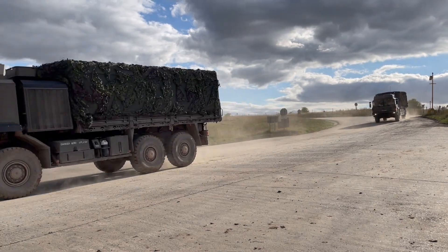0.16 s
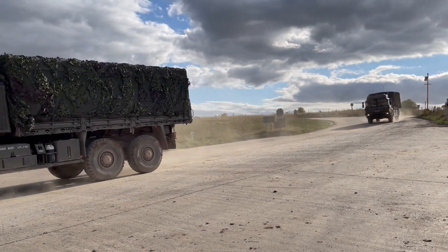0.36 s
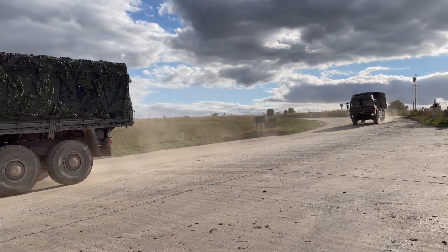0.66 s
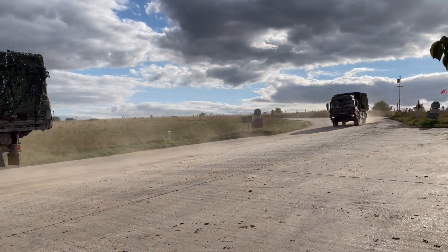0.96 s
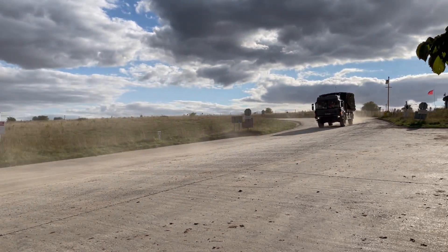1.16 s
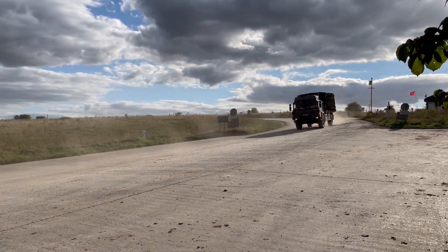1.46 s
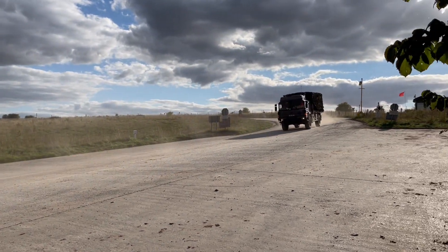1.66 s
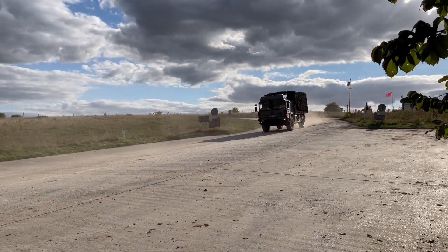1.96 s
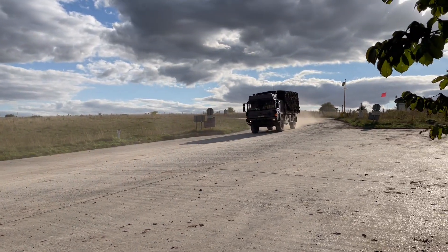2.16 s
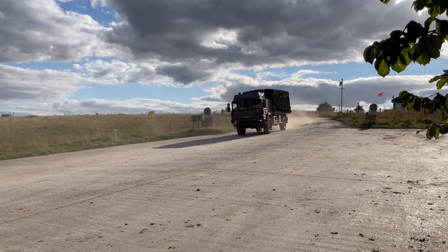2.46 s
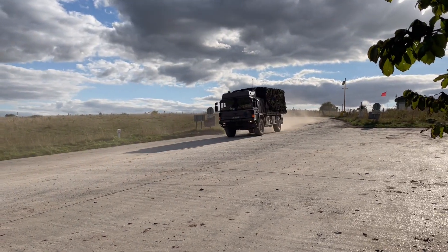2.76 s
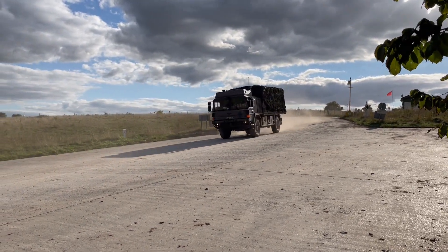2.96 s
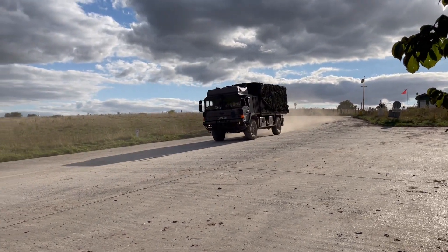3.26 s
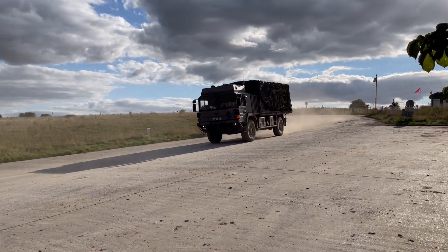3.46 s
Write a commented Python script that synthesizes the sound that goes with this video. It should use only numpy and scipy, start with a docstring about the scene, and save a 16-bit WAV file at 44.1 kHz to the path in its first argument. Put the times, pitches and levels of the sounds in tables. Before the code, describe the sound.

Low truck engine and tyre roar leaving, panels clattering, valves hissing, another heavy truck nearing

```python
"""Tyre and fan roar, exhaust growl and a low drone come first: a heavy truck on a dusty concrete track.
It drives away while a second one nears. Roar is coloured noise, growl pulsed noise through a resonance;
engines, drone and gear whine are sums of wavering orders. Knocks in loose panels clatter, gravel ticks,
air valves hiss in four bursts (shaped noise), two thin squeaks end it (wobbling sines).
Two microphone ports hear it with their own phase and balance."""
import sys
import numpy as np
from scipy import signal
from scipy.fft import rfft, irfft
from scipy.io import wavfile
from scipy.ndimage import uniform_filter1d

SR = 44100
rng = np.random.default_rng(int(sys.argv[2]) if len(sys.argv) > 2 else 0)


def master_out(mix):
    """Clip the mix to full scale and print it as 16-bit PCM to the path in sys.argv[1]."""
    frames = np.transpose(np.atleast_2d(mix))
    ceiling = np.clip(frames, -1, 1)
    pcm = np.round(ceiling * 32767).astype(np.int16)
    wavfile.write(sys.argv[1], SR, pcm)


N = 158760


def amp(db):
    """Level in dB to amplitude factor."""
    return 10 ** (np.asarray(db) / 20)


def evened(x):
    """Scale to unit RMS."""
    return x / np.sqrt(np.mean(x ** 2) + 1e-20)


def curve(rows, x):
    """Every later column of a table, interpolated over its first column at x."""
    cols = np.transpose(rows)
    return [np.interp(x, cols[0], c) for c in cols[1:]]


def slow(top_hz, t):
    """Slow unit-RMS drift: 16 random-phase sines up to top_hz, weaker as they quicken."""
    rates_hz = np.geomspace(top_hz / 8, top_hz, 16)
    return evened(sum(np.sin(2 * np.pi * (f * t + rng.random())) / np.sqrt(f) for f in rates_hz))


def add(mix, start_s, sound):
    """Add a sound into the mix, cut at the end."""
    part = mix[:, round(start_s * SR):][:, :sound.shape[-1]]
    part += sound[..., :part.shape[1]]


def ring(hz, t60_s):
    """One decaying mode: a sine losing 60 dB in t60_s."""
    t = np.arange(1500) / SR
    return amp(-60 * t / t60_s) * np.sin(2 * np.pi * hz * t)


def firing_throb(depth):
    """Loudness pulsing at twice the first truck's shaft-order base, its firing rate."""
    turns = np.cumsum(curve(LEAVING, np.arange(N) / SR)[0]) / SR
    return 1 + depth * np.cos(4 * np.pi * turns)


def smooth_noise(frames, bins, over_frames, over_bins):
    """Unit-RMS random field (bins x frames), averaged over time and frequency."""
    field = uniform_filter1d(rng.standard_normal((frames, bins)), size=over_frames, axis=0)
    return evened(uniform_filter1d(field, size=over_bins, axis=1)).T


# Roar base colour: f/Hz, density/dB per Hz for first truck alongside, first leaving, second nearing
ROAR_COLOUR = [(39.5, -47, -60, -61), (72, -64, -46, -50.5), (134, -47.5, -51, -49.5),
               (210, -57, -54.5, -53.5), (320, -54.5, -53.5, -56), (476, -60, -62, -61),
               (685, -59.5, -62.5, -60), (1280, -61, -68.5, -65.5), (1750, -72.5, -67.5, -73),
               (1910, -70, -72, -77), (2510, -75.5, -71.5, -75), (3490, -71.5, -79, -78.5),
               (4410, -79, -78.5, -80), (5500, -81.5, -83.5, -87.5), (8550, -89, -89.5, -93.5),
               (11100, -92.5, -89.5, -99), (14400, -100, -101, -111)]
# Colour turning points: alongside until t/s, leaving from t/s, leaving until t/s, nearing from t/s
COLOUR_TIMES_S = [.35, 1.1, 2.3, 2.85]
# Roar swell: t/s, bass gain/dB, middle gain/dB, treble gain/dB
ROAR_SWELL = [(0, 1, -2, 1.5), (.3, 1, -0.5, 1), (.65, 0, -0.5, 1.5), (.85, 3.5, -0.5, 1.5),
              (1.1, -1, 2.5, 3), (1.35, 0.5, 3, 1), (1.6, -1, 0.5, 0.5), (1.9, 0.5, 0.5, 0.5),
              (2.1, -3.5, 1.5, -2.5), (2.25, -3, 1.5, -1.5), (2.45, -3, -0.5, -5.5), (2.66, -1.5, -4.5, 3),
              (2.74, -3.5, -2, 1), (3.05, -2, 1, 3.5), (3.2, -1.5, -1, 1), (3.4, -4, 0, 2),
              (3.6, 0, -1.5, 0.5)]
# Centre of each swell band: f/Hz
SWELL_CENTRES_HZ = [200, 925, 9000]
PATCH_DB, FLICKER_DB, THROB_DEPTH = 1.7, 0.55, 0.03


def roar():
    """Tyre and fan noise: drifting colour, band swells, patches, flicker and a firing throb."""
    hz, t, spectrum = signal.stft(rng.standard_normal((2, N)), SR, nperseg=1024, noverlap=768)
    log_hz = np.log(hz + 1)
    cols = np.transpose(ROAR_COLOUR)
    alongside, leaving, nearing = (np.interp(log_hz, np.log(cols[0]), c)[:, None] for c in cols[1:])
    to_leaving = np.interp(t, COLOUR_TIMES_S[:2], [0, 1])
    to_nearing = np.interp(t, COLOUR_TIMES_S[2:], [0, 1])
    db = alongside + to_leaving * (leaving - alongside) + to_nearing * (nearing - leaving)
    db = db + 10 * np.log10(SR / 2)  # density to white-noise gain
    for band, swell_db in enumerate(curve(ROAR_SWELL, t)):
        share = np.interp(log_hz, np.log(SWELL_CENTRES_HZ), np.eye(3)[band])
        db = db + share[:, None] * swell_db
    patches = smooth_noise(len(t), len(hz), 9, 5)
    flicker = smooth_noise(len(t), len(hz), 3, 150)
    uneven_share = np.clip(hz / 600, 0, 1)[:, None]  # steadier below 600 Hz
    db = db + uneven_share * (PATCH_DB * patches + FLICKER_DB * flicker)
    noise = signal.istft(spectrum * amp(db), SR, nperseg=1024, noverlap=768)[1][:, :N]
    return noise * firing_throb(THROB_DEPTH)


# First truck's exhaust growl: t/s, level/dB
GROWL_LEVEL = [(0, -37.5), (.55, -37), (1.1, -33), (1.4, -58), (2, -70)]
GROWL_HZ, GROWL_WIDTH_HZ, GROWL_DEPTH, GROWL_LUMP_DB = 755, 170, .3, 2


def growl():
    """Noise puffs at the firing rate through one pipe resonance, twice over, in uneven lumps."""
    t = np.arange(N) / SR
    puffs = rng.standard_normal((2, N)) * firing_throb(GROWL_DEPTH)
    b, a = signal.iirpeak(GROWL_HZ, GROWL_HZ / GROWL_WIDTH_HZ, SR)
    level = amp(curve(GROWL_LEVEL, t)[0] + GROWL_LUMP_DB * slow(14, t))
    return level * evened(signal.lfilter(b, a, signal.lfilter(b, a, puffs)))


WAVER_DB, SPEED_WAVER_SHARE, WANDER_RAD = 2.5, .008, .55


def engine(rows, orders):
    """Orders of one turning speed, each wavering in level and wandering in phase."""
    t, coarse = np.arange(N) / SR, np.arange(0, N / SR + 0.013, .01)
    hz, db, tilt_db = (curve(rows, t) + [0])[:3]  # no brightness column: flat
    speed_waver = np.interp(t, coarse, slow(8, coarse))
    turns = np.cumsum(hz * (1 + SPEED_WAVER_SHARE * speed_waver)) / SR
    hum = 0
    for multiple, order_db in orders:
        bright_db = tilt_db * np.log2(multiple / orders[0][0])
        waver_db = WAVER_DB * np.interp(t, coarse, slow(16, coarse))
        phase = 2 * np.pi * (multiple * turns + rng.random())
        wander = WANDER_RAD * np.interp(t, coarse, slow(20, coarse))
        hum = hum + amp(order_db + bright_db + waver_db) * np.cos(phase + wander)
    return amp(db) * np.sqrt(2) * hum


# First truck's low drone: t/s, f/Hz, level/dB, brightness/dB per octave
DRONE_TRACK = [(0, 64.24, -26, 0), (.3, 67.82, -24, -3), (.9, 68.48, -27, -6), (1.35, 66.67, -26.5, -9),
               (1.75, 64.33, -30, 5), (2.05, 64.12, -26.5, 6), (2.5, 61.2, -30.5, 8),
               (3.6, 63.4, -29.5, -4)]
# Drone and its companion below: frequency ratio, level/dB
DRONE_RATIOS = [(1, -3), (0.635, -7)]


def drone():
    """Two low tones of the first truck, at a fixed ratio."""
    return engine(DRONE_TRACK, DRONE_RATIOS)


# First truck's engine: t/s, shaft-order base f/Hz, level/dB, brightness/dB per octave
LEAVING = [(0, 24.6, -45.5, -0.5), (.62, 24.7, -37.5, 1.5), (.85, 24.6, -25, 0), (1.1, 24.2, -28, 1.5),
           (1.35, 23.9, -28, -0.5), (1.76, 23.3, -29.5, 0), (2.1, 22.7, -26, -1), (2.35, 22.3, -35, 0.5),
           (2.64, 22.1, -28.5, -1), (2.72, 22, -44.5, -1)]
# Its orders: multiple of base, level/dB
LEAVING_PARTS = [(2, 0.5), (3, -3.5), (4, -2), (5, -3.5), (6, -6.5), (7, -7.5), (8, -3), (9, -12.5),
                 (12, -12.5), (17, -16.5)]


def leaving_engine():
    """First truck's diesel: shaft orders on a base that slowly falls."""
    return engine(LEAVING, LEAVING_PARTS)


# Second truck's engine: t/s, shaft-order base f/Hz, level/dB
NEARING_TRACK = [(1.3, 26.59, -41), (1.9, 26.99, -36.5), (2.35, 27.44, -26), (2.62, 27.59, -27),
                 (2.69, 27.53, -35), (2.77, 27.73, -25.5), (3.2, 28.15, -33.5), (3.41, 28.06, -24.5),
                 (3.6, 28.1, -28.5)]
# Its orders: multiple of base, level/dB
NEARING_PARTS = [(3, 0), (5, -16), (7, -16), (8, -13), (9, -16)]


def nearing_engine():
    """Second truck's diesel: odd orders and the eighth on a base that creeps up."""
    return engine(NEARING_TRACK, NEARING_PARTS)


# Second truck's gear whine: t/s, f/Hz, level/dB
WHINE_TRACK = [(2.6, 497, -56), (3, 506, -46), (3.3, 512, -44), (3.6, 510, -43)]


def gear_whine():
    """One wavering gear tone."""
    return engine(WHINE_TRACK, [(1, 0)])


# Body clatter over bumps: centre t/s, half-width/s, level/dB, brightness/dB per octave
CLATTER_BURSTS = [(.55, .03, -34.5, -4), (.58, .04, -39, 4), (.92, .045, -39, 3), (1.112, .045, -36, 1),
                  (2.057, .022, -32.5, -2.5), (2.162, .035, -33, -2.5), (2.775, .03, -39, 4),
                  (2.797, .045, -29.5, -3), (2.855, .03, -38, -1), (2.993, .03, -39, 3)]
# Loose panel modes: f/Hz, level/dB
PANEL_MODES = [(506, 2), (800, 1), (1300, -3), (1670, -4), (2030, -6), (2450, -5), (2910, -7)]
PANEL_T60_S, KNOCKS_PER_S = .02, 1600


def clatter():
    """Clumps of random knocks exciting the modes of loose panels."""
    out = np.zeros((2, N))
    for centre_s, half_s, db, tilt_db in CLATTER_BURSTS:
        n = round(2 * half_s * SR)
        chance, strength = rng.random((2, 2, 8000))[..., :n]
        knocks = (chance < KNOCKS_PER_S / SR) * (strength - .5) ** 3 * np.hanning(n)
        panel = sum(amp(mode_db + tilt_db * np.log2(hz / PANEL_MODES[0][0])) * ring(hz, PANEL_T60_S)
                    for hz, mode_db in PANEL_MODES)
        burst = evened(signal.fftconvolve(knocks, panel[None], axes=1))
        add(out, centre_s - half_s, amp(db) * burst)
    return out


# Gravel ticks: t/s, lower-mode level/dB, f/Hz
GRAVEL_TICKS = [(.8899, -25, 2600), (.927, -28, 3700), (.9822, -24, 3900)]
TICK_T60_S, UPPER_RATIO, UPPER_DB = .004, 1.6, -3


def ticks():
    """Gravel ticks: two fast-decaying modes each."""
    out = np.zeros((2, N))
    for start_s, db, hz in GRAVEL_TICKS:
        upper = amp(UPPER_DB) * ring(hz * UPPER_RATIO, TICK_T60_S)
        add(out, start_s, amp(db) * (ring(hz, TICK_T60_S) + upper))
    return out


# Air valve bursts: start t/s, hold/s, level/dB
AIR_BURSTS = [(1.669, .15, -36), (2.073, 0.11, -44.5), (2.281, 0.23, -41.5), (2.546, 0.16, -46.5)]
# Hiss colour: f/Hz, gain/dB
HISS_COLOUR = [(1500, 4), (3000, 4.5), (6000, 2), (9000, 3.5), (12000, 0), (15800, -10)]
AIR_RISE_S, AIR_SAG_DB, AIR_FALL_DB_PER_S = 0.0087, -6.5, 300


def air():
    """Air valve: bright noise with a quick rise, sagging hold and quick close."""
    t, hz = np.arange(N) / SR, np.fft.rfftfreq(N, 1 / SR)
    f, gain_db = np.transpose(HISS_COLOUR)
    colour = amp(np.interp(np.log(hz + 1), np.log(f), gain_db)) * np.minimum(hz / f[0], 1) ** 2
    hiss = evened(irfft(rfft(rng.standard_normal((2, N))) * colour, N))
    shape = np.zeros(N)
    for start_s, hold_s, db in AIR_BURSTS:
        age_s = t - start_s
        sag_db = AIR_SAG_DB * np.clip(age_s / hold_s, 0, 1)
        fall_db = AIR_FALL_DB_PER_S * np.maximum(age_s - hold_s, 0)
        shape += np.clip(age_s / AIR_RISE_S, 0, 1) * amp(db + sag_db - fall_db)
    return hiss * shape


# Thin squeaks: start t/s, length/s, level/dB (peak 6 dB above), f/Hz
SQUEAK_TONES = [(3.11, .075, -57, 6500), (3.43, .06, -58, 6370)]


def squeaks():
    """Short high sines with randomly wobbling pitch."""
    out = np.zeros((2, N))
    for start_s, length_s, db, hz in SQUEAK_TONES:
        n = len(np.arange(0, length_s, 1 / SR))
        wobble_hz = 900 * uniform_filter1d(rng.standard_normal(5000), size=200)[:n]
        tone = np.sin(2 * np.pi * np.cumsum(hz + wobble_hz) / SR)
        add(out, start_s, amp(db) * 2 * np.hanning(n) * tone)
    return out


# Microphone ports: f/Hz, left lead/rad, likeness 0-1, left minus right level/dB
PORT_PAIR = [(0, 0, .99, -2.5), (90, .27, .97, -2.4), (250, .78, .9, -1.5), (500, 1.55, .75, 1.2),
             (800, 1.5, .72, 3.2), (1100, 2.3, .68, 0), (1400, 3.3, .5, -2.9), (1800, 4.6, .72, -.7),
             (2200, 6.15, .82, -.8), (2700, 7, .74, -1.5), (3300, 7.5, .6, .9), (4000, 6.3, .37, 1),
             (4500, 6.5, .7, 0), (5200, 7.7, .37, 0), (5800, 6, .17, -1.3), (6500, 5.5, .66, -1.8),
             (7300, 4.1, .68, -.8)]
# The same above 8 kHz: f/Hz, left lead/rad, likeness 0-1, left minus right level/dB
PORT_PAIR_TREBLE = [(8250, np.pi, .99, 0), (9900, np.pi / 2, .85, 0), (11600, 0, .99, 0),
                    (13200, -np.pi / 2, .8, 0), (14400, -np.pi, .99, 0)]


def ports(direct, scattered):
    """Right port: the left's sound phase-shifted, mixed with unrelated scattered sound."""
    lead_rad, like, balance_db = curve(PORT_PAIR + PORT_PAIR_TREBLE, np.fft.rfftfreq(N, 1 / SR))
    like = np.clip(like, 0, 1)
    left = rfft(direct)
    mixed = like * left + np.sqrt(1 - like ** 2) * rfft(scattered)
    right = np.exp(-1j * lead_rad) * mixed
    half = amp(balance_db / 2)
    return irfft(np.array([left * half, right / half]), N)


ECHO_S = .06  # hum back from ground and verge


def scene():
    """Noise layers and hum, direct and scattered, into the two ports."""
    direct, scattered = roar() + growl() + air() + clatter() + ticks() + squeaks()
    hum = leaving_engine() + nearing_engine() + drone() + gear_whine()
    echo = np.roll(hum, round(ECHO_S * SR))  # end wraps to the start
    return ports(direct + hum, scattered + echo)


LOW_CUT_HZ, EDGE_HZ = 41, 15800


def record(dry):
    """Microphone low cut, then the band limit."""
    low_cut = signal.butter(4, LOW_CUT_HZ, "high", fs=SR, output="sos")
    band_limit = signal.firwin(511, EDGE_HZ, window=("kaiser", 9), fs=SR)
    return signal.oaconvolve(signal.sosfilt(low_cut, dry), band_limit[None], "same")


dry = scene()
out = record(dry)
master_out(out)
```